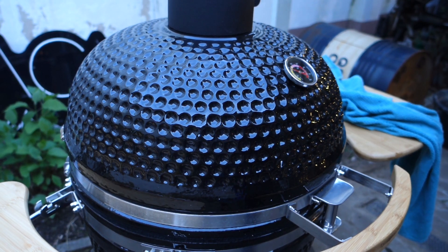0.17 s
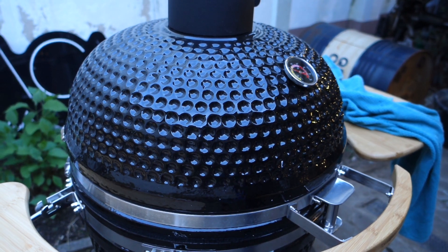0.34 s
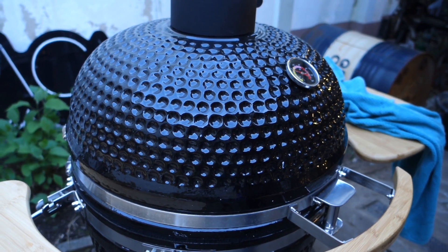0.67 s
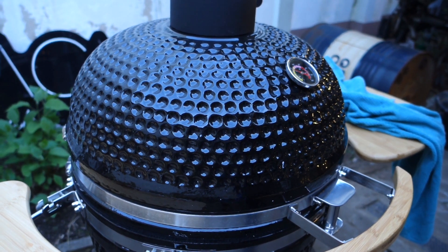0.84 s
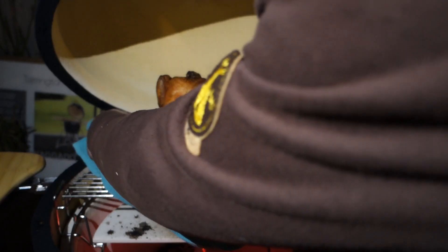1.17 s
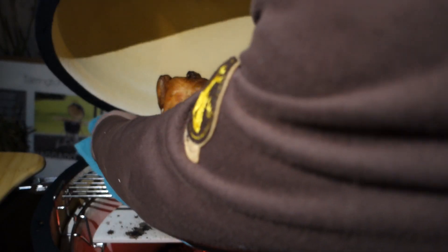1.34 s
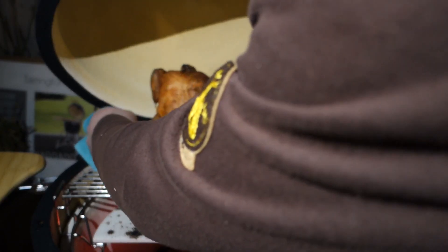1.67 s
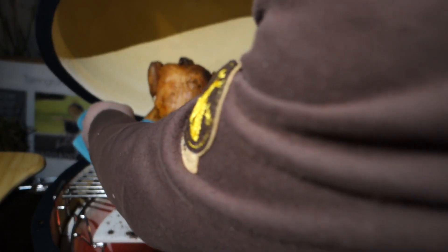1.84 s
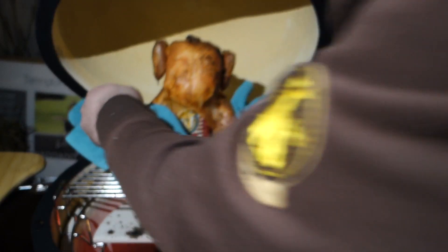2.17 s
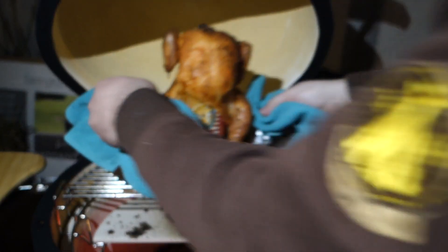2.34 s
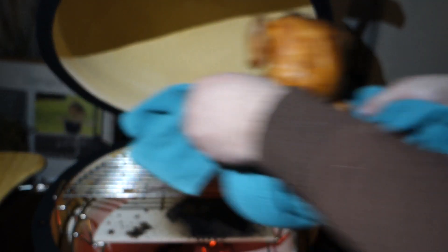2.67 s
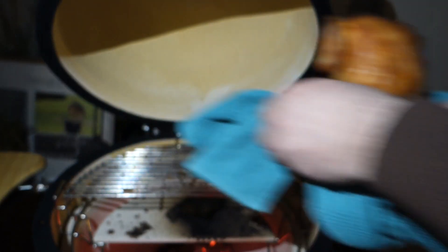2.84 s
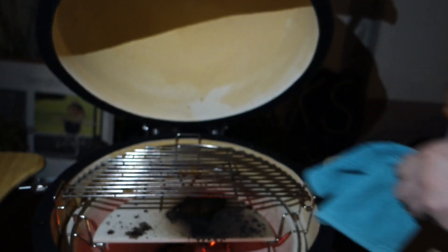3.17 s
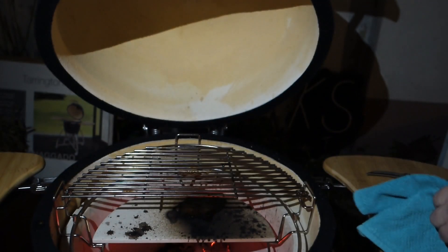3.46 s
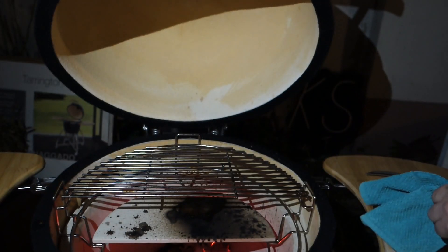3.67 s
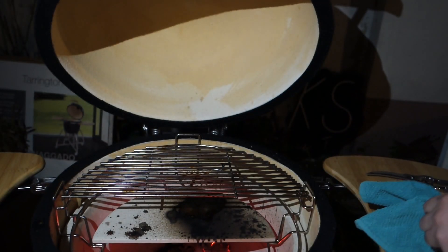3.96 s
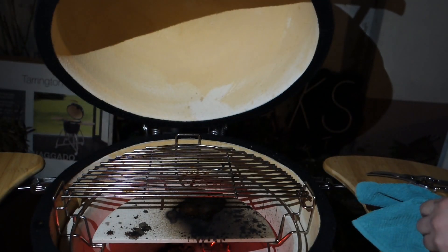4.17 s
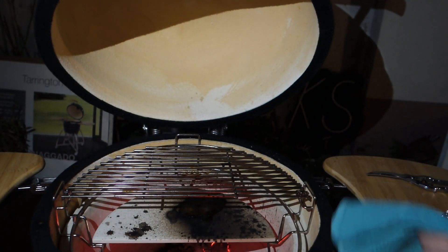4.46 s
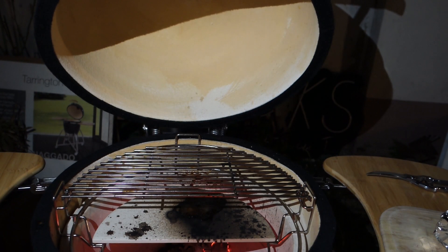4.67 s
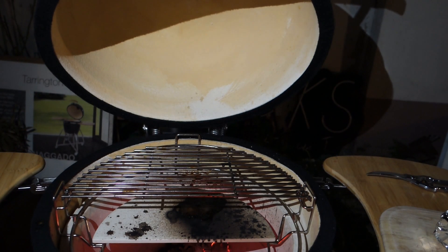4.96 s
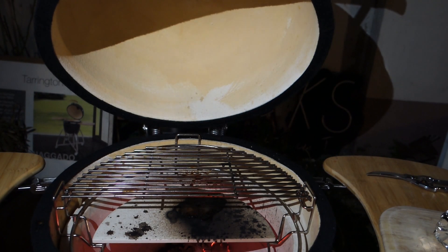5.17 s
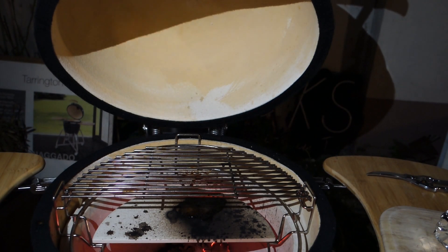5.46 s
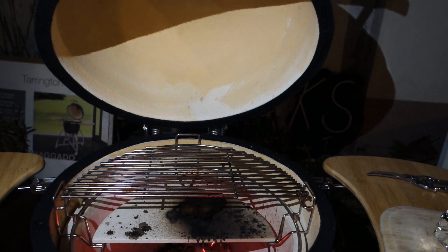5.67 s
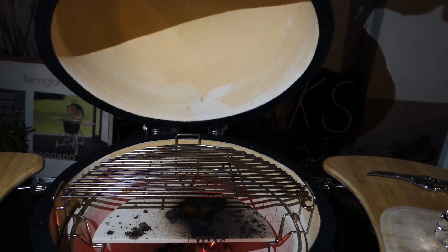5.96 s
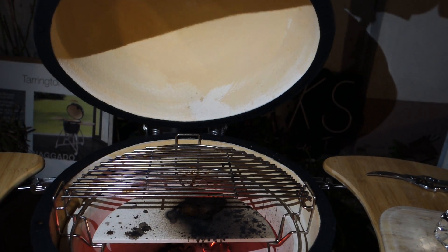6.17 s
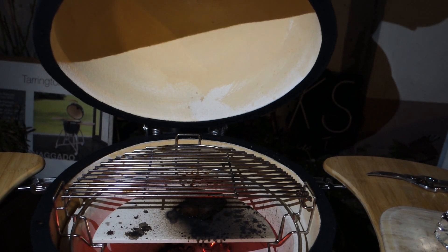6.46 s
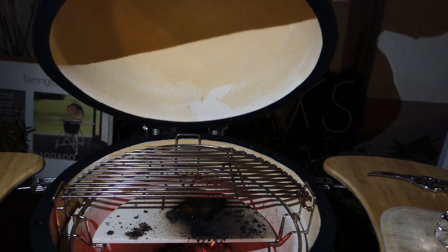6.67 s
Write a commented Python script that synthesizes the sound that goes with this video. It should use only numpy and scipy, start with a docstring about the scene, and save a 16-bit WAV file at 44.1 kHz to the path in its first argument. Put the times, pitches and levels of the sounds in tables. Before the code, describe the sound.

A quiet yard with far traffic, soft hiss and a faint hum lasts one second, then cuts hard to an open charcoal grill. Fat sizzles finely and embers snap irregularly. Cloth rubs and a tray clatters quickly on the metal grate, ending in a firm knock; another solid knock follows at four seconds. Crackling continues to the end. Close stereo microphone outdoors, grill slightly to the right.

```python
"""Sizzling ceramic grill.

A closed grill stands in a quiet yard with far traffic, hiss and a faint hum (coloured noise) and one faint tick.
The yard fades out and the sound cuts to the open grill at dusk. Fat sizzles as noise broken into tiny bursts.
Embers and droplets pop as short noise bursts in three bands; cloth and tray rub as coarser noise bursts.
The tray clacks and knocks on grate and side table as decaying modes. A small stereo microphone has the grill
to its right; the sound closes steeply near 16 kHz."""
import sys
import numpy as np
from scipy import signal
from scipy.fft import rfft, irfft, next_fast_len
from scipy.io import wavfile
from scipy.ndimage import uniform_filter1d, map_coordinates

SR = 44100
rng = np.random.default_rng(int(sys.argv[2]) if len(sys.argv) > 2 else 0)


def int16_out(signal):
    """Quantize to a 16-bit WAV file."""
    q = np.round(np.clip(np.atleast_2d(signal).T, -1, 1) * 32767)
    wavfile.write(sys.argv[1], SR, q.astype(np.int16))


N = 299924
TIME = np.arange(N) / SR  # s

# Distant traffic over microphone hiss: (frequency [Hz], relative level per hertz [dB])
YARD_SPECTRUM = [(40, -46), (204, -16), (491, -10), (646, -3.5), (852, -10), (2630, -16.5), (6020, -19),
                 (16000, -19)]
# Likeness of the two channels in the yard: (frequency [Hz], correlation [1])
YARD_LIKENESS = [(200, 1), (950, 0.56), (3770, -0.11)]
# Narrow hums in the daytime yard: (frequency [Hz], width of each resonance stage [Hz], relative level [dB])
HUM_BANDS = [(489, 53, 6), (631, 21, 4)]
# Pops and ticks: (time [s], crack level [dB], body re crack [dB], tip re crack [dB])
POP_EVENTS = [(0.3323, -45.5, -6.5, 9), (1.0161, -32, -6.5, -11), (1.0405, -33.5, -9, -2),
              (1.1, -34.5, -3.5, -17), (1.1406, -32, -8, -22), (1.2152, -30.5, -7, -6),
              (1.2524, -25.5, -29, -11), (1.5071, -20.5, -38, -13), (1.631, -29, -40, 1),
              (1.6485, -28, -27, -23), (1.6631, -26.5, -28, -6), (1.7547, -27, -18.5, -6),
              (1.848, -27, -15.5, -11), (2.03, -45.5, 6, 6), (2.208, -27.5, -19, -7),
              (2.3344, -30.5, -9.5, -33), (2.38, -23, -20.5, -32), (2.745, -44, 6, -10),
              (2.766, -26, -17.5, -16), (2.9895, -25, -39, -28), (3.032, -36, -5.5, -25),
              (3.0386, -31.5, -6, -25), (3.1462, -27, -38, -23), (3.2093, -24.5, -18.5, -5),
              (3.276, -22, -11, -5), (3.3926, -44, 0, -22), (3.477, -17.5, -19, -3),
              (3.6966, -29.5, -17.5, -17), (3.902, -26, -13, -9), (3.9337, -31, -0.5, -11),
              (3.9466, -26, -15, -34), (4.196, -40.5, -4.5, -20), (4.2718, -27, -41.5, -2),
              (4.355, -25, -40, -7), (4.4957, -27, -14.5, -20), (4.5307, -37, -1, -32),
              (4.6309, -26.5, -11.5, -8), (4.6464, -28, -8.5, -18), (4.7117, -25, -15.5, 9),
              (4.8284, -26, -12.5, -21), (4.848, -43, 7, -19), (4.9131, -38.5, -1.5, -20),
              (4.948, -36, -8.5, -26), (5.005, -27.5, -19, 0), (5.2025, -48.5, 5.5, -20),
              (5.2748, -33, -23, -27), (5.4386, -27, -14.5, -7), (5.469, -28, -16.5, -9),
              (5.503, -31.5, -14, -2), (5.535, -44.5, 8.5, -14), (5.6212, -34, -12, 4),
              (5.7727, -42, -23, -21), (5.8743, -39, -5, -16), (6.118, -35, -25, -15),
              (6.1294, -31, -23, -20), (6.1455, -29, -14, -22), (6.1922, -28, -22, -33),
              (6.23, -32, -17, -19), (6.2406, -20, -18, 0), (6.2804, -30.5, -14, -13),
              (6.2962, -27, -29, -7), (6.3876, -30.5, -13, -12), (6.4005, -21.5, -19.5, -4),
              (6.5432, -34, -35, -7), (6.5725, -24.5, -50, -12), (6.6902, -25.5, -13.5, -30),
              (6.7604, -42, -2, -16)]
# Crack, body and tip of a pop: (centre [Hz], width of each resonance stage [Hz], gain [dB])
POP_RESONANCES = [(8020, 5720, 12.5), (1993, 1920, 26.5), (16600, 11700, 16.5)]
# Frying fat: (time [s], sizzle level [dB], brightest band [Hz], left re right [dB])
FRYING = [(1, -56, 6800, -2), (1.5, -49.5, 7100, -1.5), (2.4, -52.5, 6970, -4), (2.65, -49, 7330, -1.5),
          (3.15, -50, 7780, -3), (3.75, -53.5, 8330, -3.5), (4, -52, 9540, -8), (4.5, -51.5, 9750, -4.5),
          (4.8, -52.5, 8100, -6.5), (5.4, -54.5, 8500, -6.5), (5.8, -51.5, 8530, -7), (6.05, -57, 8400, -4),
          (6.8, -53.5, 8200, -4)]
# Colour of the sizzle before the moving bright band: (frequency [Hz], relative level per hertz [dB])
SIZZLE_SPECTRUM = [(2200, -41), (3900, -14.5), (5000, -4.5), (6000, -8.5), (8100, -1), (10500, -3),
                   (12800, -10), (15400, -8.5)]
# Colour of the rubbing cloth and tray: (frequency [Hz], relative level per hertz [dB])
RUB_SPECTRUM = [(120, -36), (430, -8.5), (720, -2.5), (1000, 0.5), (1180, -7.5), (1480, 3), (2280, 3.5),
                (2900, -2.5), (4500, -8.5), (7000, -41)]
# Likeness of the two channels at the grill: (frequency [Hz], correlation [1])
GRILL_LIKENESS = [(240, 1), (1500, 0.8), (3770, 0.11), (15000, 0.93)]
# Strokes of cloth and tray: (time [s], peak level [dB], hold [s])
RUB_STROKES = [(1.0, -47, 0.012), (1.23, -45, 0.034), (1.44, -45, 0.22), (3.226, -44.5, 0.038),
               (3.74, -58.5, 0.31), (3.935, -46, 0.073), (4.2, -53.5, 0.27), (4.625, -45.5, 0.01),
               (5.201, -52.5, 0.5)]
# Clacks of the tray on the grate: (time [s], nominal peak level [dB])
CLACK_EVENTS = [(1.205, -42.5), (1.237, -27.5), (1.286, -36.5), (1.305, -32), (1.328, -38), (1.35, -41.5),
                (1.378, -41.5), (1.434, -34), (1.455, -31), (1.486, -30.5), (1.497, -31), (1.52, -35.5),
                (1.545, -25), (1.575, -26), (1.628, -41), (1.662, -32.5)]
# Modes of the grate: (mean frequency [Hz], mean relative level [dB])
GRATE_MODES = [(720, 0.5), (950, 7.5), (1460, 5), (1950, 2.5), (2370, 1)]
# Knocks on grate and table: (time [s], level before the bass cut [dB], pitch [Hz], low thud [Hz])
KNOCK_EVENTS = [(1.574, -24.5, 833, 248), (2.998, -46.5, 697, 593), (3.995, -24, 553, 335),
                (5.132, -46, 730, 433), (6.343, -40, 920, 710)]
# Top end of the sound: (frequency [Hz], gain [dB])
TOP_ROLL_OFF = [(15750, -2), (15950, -20.5), (16900, -38)]

CUT_S = .996
# Before the cut: traffic level, start and speed of the fade-out; hum against traffic
YARD_DB, FADE_S, FADE_DB_PER_S, HUM_DB = -62, 0.9176, 1512, -6.5
DUSK_YARD_DB, DUSK_SINK_DB_PER_S = -58, 2.5  # after the cut
BOWL_HZ, BOWL_RING = 727, 0.29  # spacing of the bowl's resonances, strength of its returned sound
BRIGHT_BODY_DB, DULL_BODY_DB = -22, 0  # body re crack of a pure snap and of a pure clatter
SNAP_DB = -23  # pops this strong start with a full pressure spike, weaker ones with less
# Lesser pops: rate, least level over the sizzle, mean excess before its cap
SMALL_PER_S, SMALL_DB, SMALL_SCATTER_DB = 65, 8, 4.5
SMALL_BODY_DB, SMALL_TIP_DB, COLOUR_SCATTER_DB = -24, -15, 4.5  # mean re crack; spread to either side
LIFT_FROM_DB, LIFT_GROWS = -57.5, .9  # sizzle level of no lift; dB of lift per dB of sizzle above it
STROKE_RISE_DB_PER_S, STROKE_FALL_DB_PER_S, RUB_BED_DB = 224, 127, -58
GRATE_T60, GRATE_DB = .027, -6  # s; offset of all modes from the clack's level
CLACK_CRACK_DB, CLACK_BODY_DB, CLACK_TIP_DB = 1.5, -10, -9  # crack re clack; body and tip re crack
RATTLE_DB, RATTLE_T60, RATTLE_HZ = -17, .5, (380, 950)  # noisy tail of a knock: rms re knock, s, band
TOP_HZ = 16900


def amp(db):
    """Decibel law: twenty decibels are a factor of ten in amplitude."""
    return 10 ** (np.asarray(db) / 20)


def unit(x):
    """Normalization to an rms value of one."""
    return x / np.sqrt(np.mean(x ** 2) + 1e-20)


def along(points, hz):
    """Linear interpolation of (frequency, value) points on a logarithmic frequency axis."""
    f, value = np.transpose(points)
    return np.interp(np.log(hz + 1), np.log(f + 1), value)


def curves(rows):
    """Linear interpolation in time of every column after the first."""
    s, *columns = np.transpose(rows)
    return [np.interp(TIME, s, column) for column in columns]


def wobble(rate):
    """Band-limited random fluctuation: a smooth spline through `rate` random knots a second."""
    knots = rng.standard_normal(int(N * rate / SR) + 4)
    return map_coordinates(knots, [np.arange(N) * rate / SR])


def filtered(x, response):
    """Linear filtering: the spectrum times a response that depends on frequency."""
    m = next_fast_len(N + SR // 2)
    return irfft(rfft(x, m) * response(np.fft.rfftfreq(m, 1 / SR)), m)[..., :N]


def resonance(hz, width_hz):
    """Cascaded resonance: two identical causal stages steepen the flanks."""
    return lambda f: (1j * f * width_hz / (hz * hz - f * f + 1j * f * width_hz)) ** 2


def spread(pair, spectrum, alike):
    """Interchannel coherence: mid and side noises mix to a pair of set colour and likeness, at rms one."""
    def mid_side(hz):
        turn = np.arccos(np.clip(along(alike, hz), -1, 1)) / 2
        return amp(along(spectrum, hz)) * [np.cos(turn), np.sin(turn)]
    mid, side = filtered(pair, mid_side)
    return unit(np.array([mid + side, mid - side]))


def grainy(per_s, scatter_db, t60, share, patchy_db):
    """Shot noise: decaying random bursts common to both channels modulate noise with lasting streaks."""
    z = signal.stft(rng.standard_normal((2, N)), nperseg=512)[2]
    # average over neighbouring bands, then over frames
    field = uniform_filter1d(rng.standard_normal(z.shape[1:]), size=4, axis=0)
    field = uniform_filter1d(field, size=40, axis=1, mode="wrap")
    noise = signal.istft(z * amp(patchy_db * unit(field)), nperseg=512)[1][:, :N]
    luck, size = rng.random(N), np.minimum(rng.exponential(size=N), 3.5)
    starts = (luck < per_s / SR) * amp(scatter_db * size)
    bursts = unit(signal.lfilter([1], [1, -amp(-60 / (t60 * SR))], starts))
    return noise * np.sqrt(1 - share + share * bursts ** 2)


def sides():
    """Intensity stereophony: opposite gains hold the source to the right by a varying amount."""
    pan_db = curves(FRYING)[2]
    return amp([pan_db / 2, -pan_db / 2])


def radiated(x):
    """Radiation efficiency: small struck things send out little bass."""
    return filtered(x, lambda hz: hz ** 4 / (hz ** 4 + 310.0 ** 4))


def yard():
    """Diffuse background: traffic is alike in both channels, hiss is not; a resonant hum stops at the cut."""
    day_db = YARD_DB - FADE_DB_PER_S * np.maximum(TIME - FADE_S, 0)
    dusk_db = DUSK_YARD_DB - DUSK_SINK_DB_PER_S * (TIME - CUT_S)
    level_db = np.where(TIME < CUT_S, day_db, dusk_db)
    noise = grainy(per_s=17, scatter_db=2, t60=0.013, share=0.02, patchy_db=2)
    traffic = spread(noise, YARD_SPECTRUM, YARD_LIKENESS)
    hum = filtered(rng.standard_normal(N),
                   lambda f: sum(amp(db) * resonance(hz, width)(f) for hz, width, db in HUM_BANDS))
    return amp(level_db) * (traffic + amp(HUM_DB) * unit(hum) * (TIME < CUT_S))


def pops():
    """Impulsive rupture: a burst common to both channels, then scattered echoes from bowl and lid."""
    t = np.arange(SR // 12) / SR
    kicks = np.zeros((3, 2, N + len(t)))  # (band, channel, sample)
    # crack, body, tip [s]: the body swells and rings more slowly than the crack
    rise = np.array([.0003, .0005, .0003])[:, None, None]
    burst_t60 = np.array([.007, .018, .0043])[:, None, None]
    echo_t60 = np.array([.022, .035, .022])[:, None, None]
    snaps = [(s, db + CLACK_CRACK_DB, CLACK_BODY_DB, CLACK_TIP_DB) for s, db in CLACK_EVENTS]
    for s, db, body_db, tip_db in [*POP_EVENTS, *snaps, *small_pops()]:
        dull = np.clip((body_db - BRIGHT_BODY_DB) / (DULL_BODY_DB - BRIGHT_BODY_DB), 0, 1)
        slow = 0.6 + 0.35 * dull  # stretches rise and decay: dull pops fizzle, bright ones snap
        shared = rng.standard_normal((3, 1, len(t)))
        own = rng.standard_normal((3, 2, len(t)))
        burst = amp(-60 * t / (slow * burst_t60)) * (1 - np.exp(-t / (slow * rise))) ** 2 * shared
        burst = burst / np.linalg.norm(burst, axis=2, keepdims=True) * np.sqrt(slow)
        # the pressure spike of the rupture, 0.5 ms in
        strength_db = max(db, db + body_db + 10)
        burst[..., SR // 2000] += 1.4 * min(amp(strength_db - SNAP_DB), 1)
        echo_shape = amp(-19.5 - 60 * t / echo_t60) * (1 - np.exp(-t / 0.001))
        echoes = echo_shape * (shared + 1.1 * own)
        gain = amp(db + np.array([0, body_db, tip_db]))[:, None, None]
        kicks[..., round(s * SR):][..., :len(t)] += gain * (burst + echoes)
    crack, body, tip = [amp(gain_db) * filtered(kick[:, :N], resonance(hz, width))
                        for kick, (hz, width, gain_db) in zip(kicks, POP_RESONANCES)]
    # the bowl sends the body of each pop back: a feedback comb
    body = filtered(body, lambda f: 1 / (1 - BOWL_RING * np.exp(-2j * np.pi * f / BOWL_HZ)))
    return sides() * (crack + body + tip)


def small_pops():
    """Poisson process: pop rows at chance moments after the cut, with levels that follow the sizzle."""
    gap, size, body, tip = rng.random((500, 4)).T
    s = CUT_S - np.cumsum(np.log(1 - gap)) / SMALL_PER_S
    at, sizzle_db = np.transpose(FRYING)[:2]
    excess_db = -SMALL_SCATTER_DB * np.log(1 - size).clip(-2)
    crack_db = np.interp(s, at, sizzle_db) + SMALL_DB + excess_db
    body_db = SMALL_BODY_DB + COLOUR_SCATTER_DB * (2 * body - 1)
    tip_db = SMALL_TIP_DB + COLOUR_SCATTER_DB * (2 * tip - 1)
    return np.array([s, crack_db, body_db, tip_db]).T[s < N / SR]


def grill():
    """Boiling and friction noise: fat boils off in tiny bright bursts, cloth and tray rub in coarser ones."""
    sizzle_db = curves(FRYING)[0]
    at, _, band_hz, _ = np.transpose(FRYING)
    nearest_row = np.searchsorted((at[1:] + at[:-1]) / 2, TIME)
    peak_hz = band_hz[nearest_row] * (1 + .02 * wobble(6))  # jumps from row to row
    fizz = grainy(per_s=220, scatter_db=3.5, t60=0.007, share=0.55, patchy_db=2.6)
    fizz = spread(fizz, SIZZLE_SPECTRUM, GRILL_LIKENESS)
    # the bright band stands out more the harder the fat sizzles
    boost_db = LIFT_GROWS * (sizzle_db - LIFT_FROM_DB)
    fizz = brightened(fizz, peak_hz, boost_db, width_hz=700, ripple_db=3, ripples=6)
    rub = grainy(per_s=110, scatter_db=1, t60=0.014, share=0.22, patchy_db=2.5)
    rub = spread(rub, RUB_SPECTRUM, GRILL_LIKENESS)
    mix = fizz * amp(sizzle_db + 1.8 * wobble(12)) + rub * strokes()
    return mix * sides() * (np.arange(N) >= CUT_S * SR)


def brightened(x, peak_hz, boost_db, width_hz, ripple_db, ripples):
    """Time-varying filter: a moving band is lifted; comb ripple, an echo off the lid, adds bands beside it."""
    hz, t, z = signal.stft(x, SR, nperseg=512)
    at = np.minimum(t * SR, N - 1).astype(int)
    hz, peak_hz = hz[:, None], peak_hz[at]
    band_db = boost_db[at] * np.exp(-((hz - peak_hz) / width_hz) ** 2)
    comb_db = ripple_db * np.cos(2 * np.pi * ripples * hz / peak_hz)
    return unit(signal.istft(z * amp(band_db + comb_db), SR, nperseg=512)[1][:, :N])


def strokes():
    """Energy addition: every stroke's gain rises, holds and falls over a quiet, unbroken bed."""
    shapes_db = [db - STROKE_RISE_DB_PER_S * np.maximum(s - TIME, 0)
                 - STROKE_FALL_DB_PER_S * np.maximum(TIME - s - held, 0) for s, db, held in RUB_STROKES]
    return np.sqrt(amp(RUB_BED_DB) ** 2 + np.sum(amp(shapes_db) ** 2, axis=0))


def clacks():
    """Modal vibration: a clack rings the grate's modes briefly, each a little detuned and at a new level."""
    out, t = np.zeros(N), np.arange(SR // 10) / SR
    for s, db in CLACK_EVENTS:
        luck = rng.standard_normal((len(GRATE_MODES), 2))
        ring = sum(amp(mode_db + 2 * louder) * np.sin(2 * np.pi * hz * (1 + .07 * sharper) * t)
                   for (hz, mode_db), (louder, sharper) in zip(GRATE_MODES, luck))
        envelope = amp(db + GRATE_DB - 60 * t / GRATE_T60) * (1 - np.exp(-t / .0007)) ** 2
        out[round(s * SR):][:len(t)] += envelope * ring
    return sides() * radiated(out)


def knocks():
    """Damped oscillation: a dull blow gives two short low rings and a wooden, noisy decay."""
    out, t = np.zeros(N + SR), np.arange(SR // 2) / SR
    wood = signal.butter(3, RATTLE_HZ, "band", fs=SR, output="sos")
    for s, db, hz, thud_hz in KNOCK_EVENTS:
        ring = amp(-60 * t * hz / 36) * np.sin(2 * np.pi * hz * t)  # falls 60 dB in 36 cycles
        thud = amp(-3.5 - 60 * t / 0.087) * np.sin(2 * np.pi * thud_hz * t)
        rattle = unit(signal.sosfilt(wood, rng.standard_normal(len(t))))
        rattle = rattle * amp(RATTLE_DB - 60 * t / RATTLE_T60)
        onset = (1 - np.exp(-t / 0.00063)) ** 2
        out[round(s * SR):][:len(t)] += amp(db) * (ring + thud + rattle) * onset
    return radiated(out[:N]) * amp([[-.6], [.6]])  # a little to the right


def scene():
    """Superposition: the pressures of all sources add in the two channels."""
    return yard() + pops() + grill() + clacks() + knocks()


def record(dry):
    """Band limitation: the sound closes steeply near 16 kHz and nothing passes above the limit."""
    return filtered(dry, lambda hz: amp(along(TOP_ROLL_OFF, hz)) * (hz < TOP_HZ))


dry = scene()
out = record(dry)
int16_out(out)
```